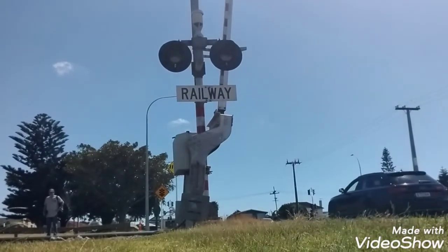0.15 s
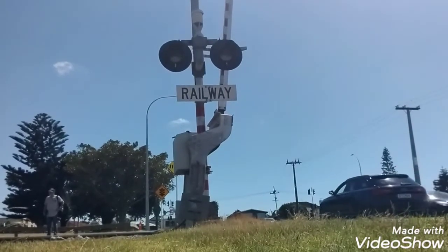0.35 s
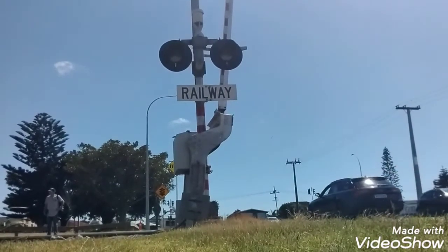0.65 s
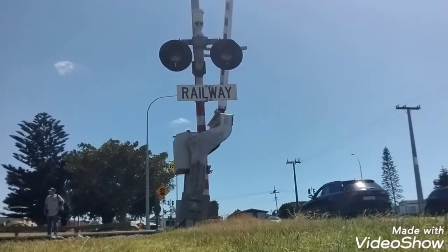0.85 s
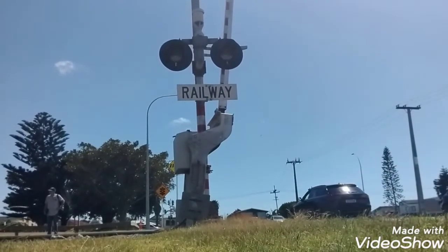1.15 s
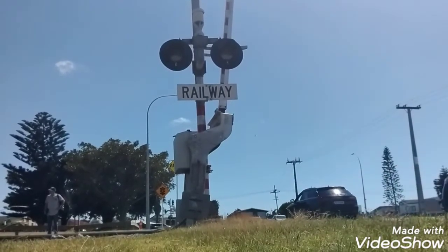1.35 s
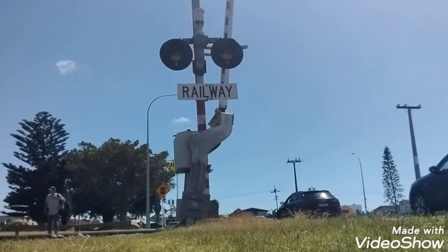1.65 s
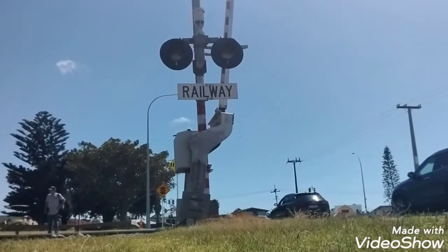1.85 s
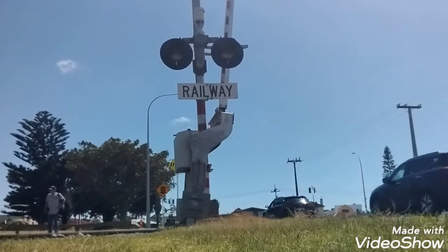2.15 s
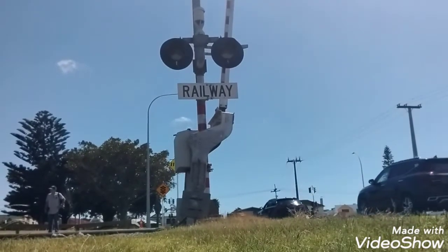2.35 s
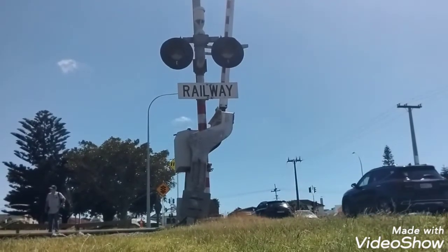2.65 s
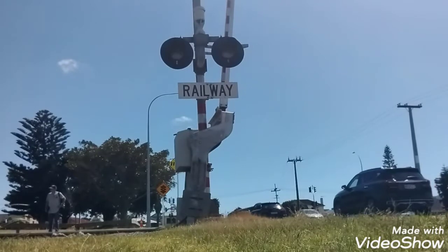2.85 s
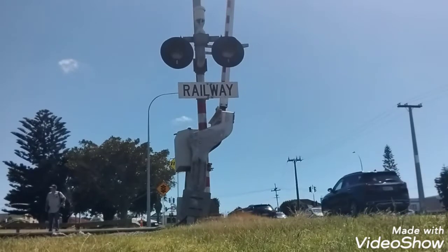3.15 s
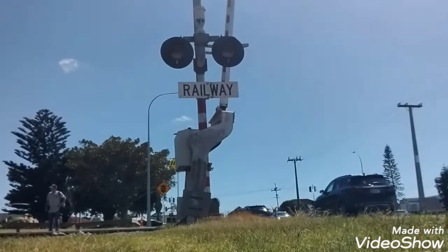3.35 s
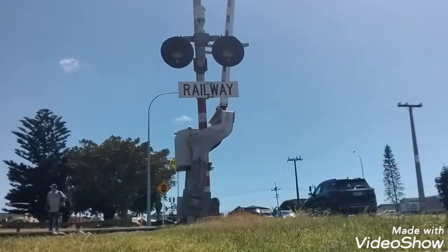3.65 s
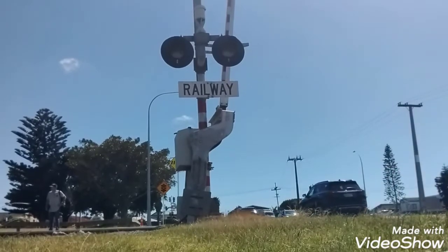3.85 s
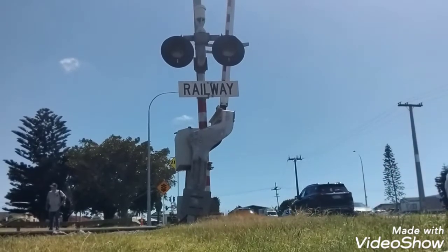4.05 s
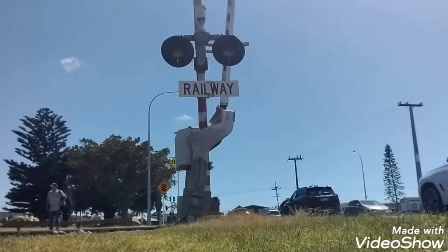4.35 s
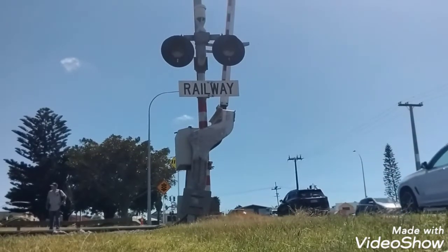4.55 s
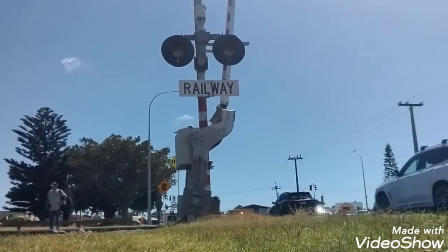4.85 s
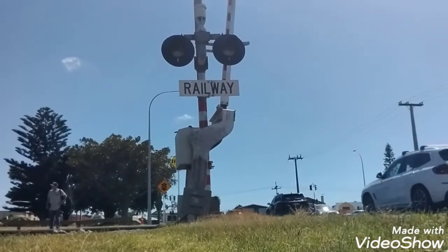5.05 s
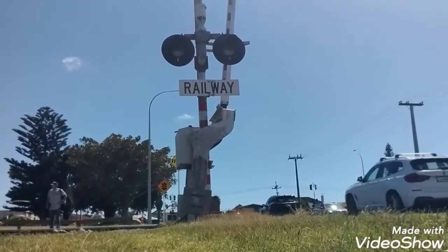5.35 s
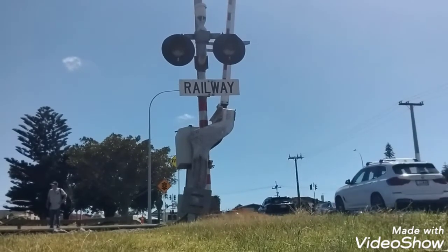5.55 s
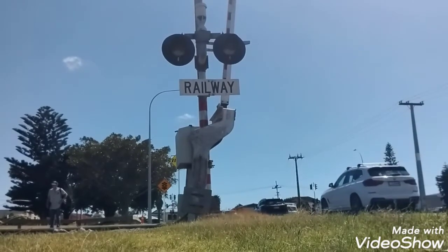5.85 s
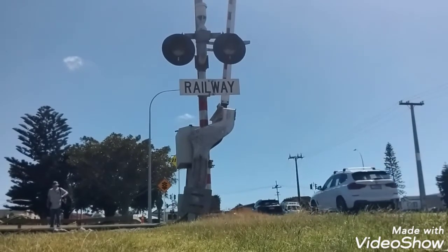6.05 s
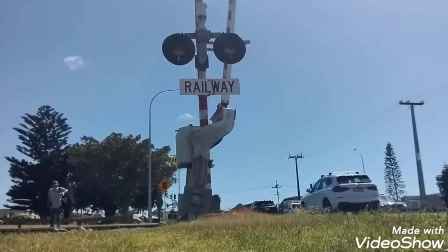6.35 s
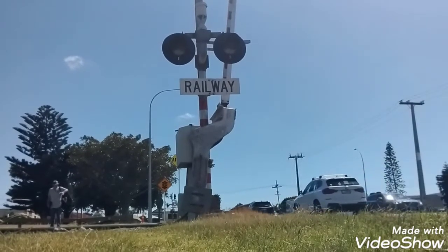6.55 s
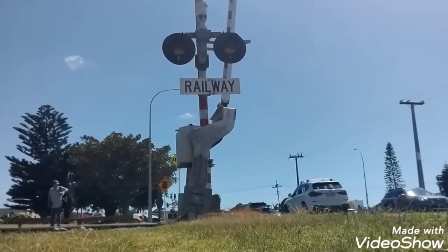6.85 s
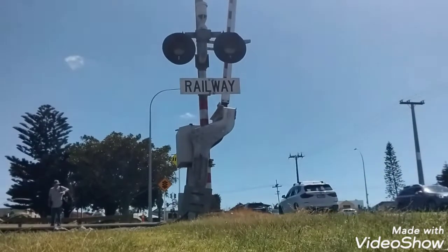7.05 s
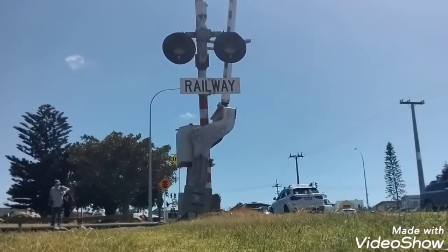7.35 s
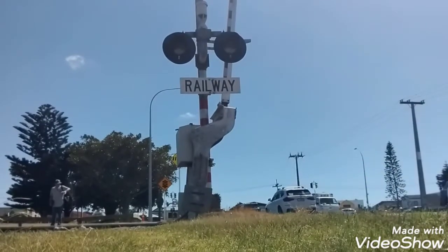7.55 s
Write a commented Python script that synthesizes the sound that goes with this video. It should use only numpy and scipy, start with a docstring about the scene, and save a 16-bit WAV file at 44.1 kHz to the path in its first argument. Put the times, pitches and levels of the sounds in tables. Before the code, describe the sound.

Open-air roadside at a level crossing, heard by a phone low in grass, in stereo. Throughout, slow cars make a low, uneven rumble with muted tyre roar, under a thin flickering hiss of insects and dry grass. Sparrows chirp several times a second, short, slightly hoarse, mostly falling whistles with brief echoes. From 0.4 to 2.4 s wheels thump dully over the rails; a low far engine drone swells around 1.4-2 s amid faint wavering hums. A tiny dry tick comes at 2.1 s. Treble dips briefly near 3.2 s; the road is quieter from 3 to 5 s, with a soft grass brush at 4.6 s. Tyres scrub at 5.4 and 6.5 s, with knocks from 5.4 to 6.5 s. From about 6.2 s a close engine revs up, its deep throbbing boom strongest at 6.6-7.1 s, then drops in pitch and fades by 7.5 s, leaving rumble and a last chirp.

```python
"""A low rumble of cars rolling slowly over a level crossing, under a treble hiss, as at a phone in roadside grass.
Road roar and the hiss of insects and dry grass are noise shaped band by band; a far engine drones and others hum.
Sparrows chirp as gliding whistles with echoes, stalks tick, and wheels over the rails ring as decaying tones.
Late on, one engine revs up and falls back: a sum of sines on multiples of its firing rate."""
import sys
import numpy as np
from scipy import signal
from scipy.io import wavfile
from scipy.ndimage import uniform_filter1d

SR = 44100
rng = np.random.default_rng(int(sys.argv[2]) if len(sys.argv) > 2 else 0)


def pcm_store(signal):
    """Save signal as 16-bit PCM."""
    levels = np.round(np.clip(np.atleast_2d(signal), -1, 1) * 32767)
    wavfile.write(sys.argv[1], SR, levels.astype(np.int16).T)


N = 338688
T = np.arange(N) / SR  # time, s
LAG_S = 0.00025  # road sound reaches the left port this much late

# the two ports: (frequency [Hz], left minus right [dB], likeness [0-1])
PORT_PAIR = [(59.6, 1, 1), (300, 5, 0.99), (700, 2, 0.94), (2040, 3, 0.44), (3300, 1, 0.04),
             (4200, -2, 0.13), (6200, -12, 0), (7230, -3.5, 0.77), (8700, -0.5, 1), (9870, 1.5, 0.97),
             (12400, 11, 0.73), (15300, 20.5, 0.4)]
# revving engine: (time [s], firing rate [Hz], first-order level [dB], second-order level [dB])
REVS = [(5.9, 55.73, -50, -61), (6.08, 51.75, -51, -53), (6.19, 52.85, -45, -44.5),
        (6.37, 62.75, -33.5, -46), (6.5, 68.6, -28.5, -46), (6.59, 73.9, -24.5, -31.5),
        (6.8, 80.4, -24.5, -31), (6.87, 82.47, -23.5, -44), (7.0, 84.5, -23.5, -49),
        (7.08, 82.4, -26, -40.5), (7.226, 77, -27.5, -34), (7.31, 72, -34, -36), (7.4, 66, -41, -49),
        (7.5, 58, -57, -66)]


def undb(db):
    """Amplitude gain of a level: twenty decibels per factor of ten."""
    return 10 ** (np.asarray(db) / 20)


def walk(rate, shape=(N,), step=SR):
    """Band-limited random modulation: values held 1 / rate s, smoothed twice on the last axis; spread 1."""
    hold = max(int(step / rate), 1)
    draws = rng.standard_normal(shape[:-1] + (shape[-1] // hold + 1,))
    held = np.repeat(draws, hold, -1)
    smooth = uniform_filter1d(uniform_filter1d(held, hold), hold)[..., :shape[-1]]
    return smooth / smooth.std()


def curve(table, t):
    """Linear interpolation of a table's columns at times t."""
    s, *columns = np.transpose(table)
    return [np.interp(t, s, column) for column in columns]


def ports(x, lag_s=LAG_S):
    """Level and time difference of a point source on the road: louder but later at the left port."""
    lag = int(lag_s * SR)
    return np.array([undb(0.17) * np.roll(x, lag), undb(-3.5) * x])


def add(out, s, sound):
    """Superposition: mix a short sound in at time s."""
    i = int(s * SR)
    n = min(sound.shape[-1], N - i)
    out[..., i:i + n] += sound[..., :n]


def bed_levels(t):
    """Level in dB of each noise bed at times t; incoherent sources add in power."""
    # traffic: (time [s], rumble [dB], tyre roar [dB], tread whine [dB], air whoosh [dB])
    traffic = [(0.0, -45, -57.5, -63.5, -72), (0.68, -49.5, -53, -62, -69.5), (1.2, -49, -58, -65.5, -71.5),
               (1.6, -42, -60.5, -66, -70.5), (2.27, -47.5, -59.5, -63.5, -68),
               (3.1, -50, -63, -69.5, -74.5), (3.6, -52.5, -60, -63, -65.5), (3.91, -49.5, -57, -66, -66),
               (4.5, -51, -58.5, -64.5, -72.5), (5.15, -50.5, -58, -65, -74), (5.5, -47.5, -54.5, -64, -71),
               (6.4, -45, -58, -63.5, -72), (7.0, -42, -52, -68, -71), (7.68, -50, -56, -62, -74)]
    # narrower road bands that come and go with the cars: (time [s], growl [dB], upper whine [dB])
    narrow_bands = [(0.0, -44, -72), (0.35, -50, -69), (0.77, -43, -68), (1.15, -46, -72.5),
                    (1.6, -47, -78), (2.1, -48.5, -77), (3.23, -59.5, -79.5), (3.7, -54, -69),
                    (4.02, -55.5, -62.5), (4.55, -56.5, -65.5), (5.0, -58.5, -76), (5.39, -47, -65.5),
                    (6.0, -53.5, -68.5), (6.5, -48.5, -70), (7.1, -50.5, -70.5), (7.27, -44, -60),
                    (7.4, -61, -75), (7.68, -56, -66.5)]
    # treble: (time [s], insects [dB], grass [dB], fine grass [dB])
    treble = [(0.0, -64.5, -60, -57), (0.4, -61, -61, -62.5), (0.9, -63.5, -62.5, -61),
              (1.15, -57.5, -60, -57.5), (1.84, -59, -57, -55), (1.99, -65, -60.5, -62),
              (2.31, -58, -55, -58), (2.8, -62, -60.5, -70.5), (3.3, -63.5, -57.5, -60),
              (3.45, -61.5, -56, -67), (3.76, -59, -56.5, -61), (3.98, -61.5, -57.5, -73),
              (4.52, -68.5, -68.5, -72), (4.8, -64.5, -68, -70), (5.09, -72.5, -70, -75),
              (5.4, -64, -63.5, -70), (5.6, -65.5, -67, -74), (6.14, -63, -66, -59.5),
              (6.55, -61.5, -63.5, -69), (6.74, -58.5, -61.5, -63.5), (7.68, -58, -67.5, -72)]
    # tyres scrub over the crossing, so rumble, roar and whine jump: (time [s], rise [dB])
    scrubs = [(5.36, 6.5), (6.46, 6.5)]
    scrub_rise_s, scrub_fall_s = 0.044, 0.057
    lull_s, lull_half_s, lull_db = 3.18, 0.074, -8.5  # the treble dips briefly
    deep_db = -64  # far traffic, at a constant level

    rumble_db, roar_db, whine_db, whoosh_db = curve(traffic, t)
    # the revving car's own rumble lies 12.5 dB under its boom
    rev_db = np.interp(t, *np.transpose(REVS)[[0, 2]], -120, -120) - 12.5
    rumble_db = 10 * np.log10(undb(rumble_db) ** 2 + undb(rev_db) ** 2)

    scrub_db = 0
    for s, rise_db in scrubs:
        scrub_db = scrub_db + rise_db * np.exp(np.minimum((t - s) / scrub_rise_s, (s - t) / scrub_fall_s))
    road = [db + scrub_db for db in (rumble_db, roar_db, whine_db)]

    dip_db = lull_db * np.exp(-((t - lull_s) / lull_half_s) ** 4)
    hiss = [db + dip_db for db in curve(treble, t)]
    return [np.full(t.size, deep_db), *road, *curve(narrow_bands, t), whoosh_db, *hiss]


def bed_power(hz, t):
    """Power spectrum over time: each bed's fixed colour scaled by its moving level, summed in power."""
    # colours, in the order of bed_levels: (frequency [Hz], relative power density [dB per Hz])
    deep = [(15, -47), (25, -17), (43, -1.5), (90, -10.5), (120, -32), (200, -120)]
    rumble = [(53, -22), (90, 5.5), (119, 5.5), (160, 0), (200, -7), (330, -24.5), (430, -31), (730, -120)]
    roar = [(190, -16), (330, -2.5), (539, -2.5), (711, -12.5), (850, -15.5), (1100, -49), (1870, -120)]
    whine = [(500, -20), (850, -1.5), (1150, -6), (1300, -14), (2280, -45), (3850, -120)]
    growl = [(140, -51), (190, 2.5), (255, 3), (310, -7.5), (400, -23)]
    upper_whine = [(1000, -32), (1280, -2.5), (1480, -1), (1700, -10), (2100, -40)]
    whoosh = [(1030, -39), (1750, 7), (2860, 4), (3330, 4), (4900, -8), (6370, -41), (10800, -120)]
    insects = [(2940, -16.5), (4500, -6.5), (4850, -6), (5500, -0.5), (6070, 4.5), (6400, -1.5),
               (6900, 2.5), (7350, 1), (10100, -13), (17200, -120)]
    grass = [(4590, -50), (7500, -12), (8300, -7.5), (8900, -2), (9700, -2.5), (10750, -1), (11300, -6.5),
             (12000, -5), (15000, -38), (22000, -120)]
    fine_grass = [(6760, -36), (11500, 2), (12100, -4.5), (12800, 6.5), (13100, -7), (13500, 3.5),
                  (14200, 1.5), (15700, -4.5)]
    colours = (deep, rumble, roar, whine, growl, upper_whine, whoosh, insects, grass, fine_grass)
    power = 0
    for colour, db in zip(colours, bed_levels(t)):
        f, density_db = np.transpose(colour)
        shape = undb(np.interp(np.log(hz + 1), np.log(f), density_db, -99, -99)) ** 2
        power = power + np.outer(shape / shape.mean(), undb(db) ** 2)
    return power


def bed_flicker(hz, t):
    """Random amplitude modulation in dB, partly shared by neighbouring bands."""
    rate = t.size / t[-1]
    row = (3.5 * np.log2(1 + hz / 150)).astype(int)  # patches a few bands wide
    patches = 0.6 * walk(3.5, (row[-1] + 1, t.size), rate)  # slow swells
    patches += 1.4 * walk(18.0, patches.shape, rate)  # quick flicker
    patches = uniform_filter1d(patches[row], size=3, axis=0)
    patches += 0.33 * np.outer(hz > 7500, walk(12.0, t.shape, rate))  # gusts shake all the grass at once
    # slow random swells in each narrow band of the treble hiss
    band_swells = 2.5 * walk(1.68, (hz.size, t.size), rate) * (hz > 5000)[:, None]
    # short narrow flutters
    lumps = uniform_filter1d(walk(20.0, (hz.size, t.size), rate), size=3, axis=0)
    # patches and flutters are weaker in the treble
    patches[hz > 5000] *= 0.6
    lumps[hz > 5000] *= 0.6
    evenness = np.minimum(hz / 400, 1)[:, None]  # the bass stays more even
    return evenness * (patches + band_swells + 6.7 * lumps)


def beds():
    """Road roar and treble hiss: time-varying filtering of two noises, partly coherent between the ports."""
    size = 1024
    lag_top_hz = 4570  # above this the sound arrives from straight ahead, without lag
    frames = dict(nperseg=size, noverlap=3 * size // 4)
    hz, t, noise = signal.stft(rng.standard_normal((2, N)), SR, **frames)
    power = bed_power(hz, t)
    gain = np.sqrt(power) * undb(bed_flicker(hz, t))

    f, pan_db, like = np.transpose(PORT_PAIR)
    log_hz = np.log(hz + 1)
    pan_db = np.interp(log_hz, np.log(f), pan_db)[:, None]
    like = np.interp(log_hz, np.log(f), np.clip(like, 0, 1))[:, None]
    late = np.exp(-2j * np.pi * hz * LAG_S * (hz < lag_top_hz))[:, None]

    left = noise[0] * late * undb(pan_db / 2)
    right = (like * noise[0] + np.sqrt(1 - like ** 2) * noise[1]) / undb(pan_db / 2)
    # approximate size of the two ports' mean, divided out
    middle = np.sqrt(undb(pan_db) + undb(-pan_db) + 2 * like * np.maximum(late.real, 0)) / 2
    spectra = np.array([left, right]) * gain / middle
    return signal.istft(spectra, SR, **frames)[1][:, :N]


def engines():
    """Periodic tones: a far drone with random level and phase, and brief hums by frequency modulation."""
    # far engine drone at constant pitch, swelling and fading: (time [s], level [dB])
    drone_levels = [(0.6, -54), (1.28, -53.5), (1.4, -44.5), (2.08, -45.5), (2.18, -52), (2.63, -49),
                    (2.79, -59), (5.0, -55), (5.9, -66)]
    # passing cars: (start [s], end [s], start pitch [Hz], end pitch [Hz], level [dB])
    passing_hums = [(0.185, 1.162, 263.2, 249.6, -48), (0.52, 1.05, 223.4, 216.4, -49.5),
                    (0.99, 1.84, 368, 381, -54), (1.352, 1.997, 212.3, 198.1, -47),
                    (1.35, 2.2, 163.2, 159.8, -47), (2.305, 3.095, 96.1, 88.8, -51.5),
                    (2.689, 4.1, 182.4, 170.4, -54.5), (5.452, 5.84, 527, 581, -55),
                    (6.8, 7.901, 432, 430.4, -55.5), (7.194, 7.9, 319.7, 321.7, -56.5)]
    drone_hz = 121.6
    hum_waver = 0.032  # share of the pitch

    db, = curve(drone_levels, T)
    level = undb(db + 3.2 * walk(12.0))
    fade = np.clip((drone_levels[-1][0] - T) / 0.26, 0, 1)
    out = np.sqrt(2) * level * fade * np.sin(2 * np.pi * drone_hz * T + 0.5 * walk(6.5))
    for t0, t1, hz0, hz1, db in passing_hums:
        u = np.clip((T - t0) / (t1 - t0), 0, 1)
        glide = (hz0 + (hz1 - hz0) * u) * (1 + hum_waver * walk(30.0))
        level = undb(db + 3.0 + 2.73 * walk(28.0)) * np.sin(np.pi * u) ** 0.41
        out += level * np.sin(2 * np.pi * np.cumsum(glide) / SR)
    return out


def sparrows():
    """Frequency-modulated whistles with rough flutter, convolved with echoes off hedges and poles."""
    # notes: (time [s], length [s], start pitch [Hz], end pitch [Hz], level before echoes [dB])
    notes = [(0.196, 0.11, 4430, 3440, -66), (0.388, 0.14, 3500, 3370, -60.5),
             (0.407, 0.048, 4150, 4450, -53.5), (0.458, 0.049, 4130, 4040, -49.5),
             (.535, 0.032, 4270, 4200, -65), (0.746, 0.054, 4440, 4290, -59),
             (0.807, 0.052, 3490, 3230, -60), (0.863, 0.039, 4340, 4370, -60),
             (1.032, 0.053, 4040, 4140, -60.5), (1.103, 0.038, 6430, 6160, -54),
             (1.309, 0.074, 4550, 4400, -58.5), (1.381, 0.055, 3440, 3400, -60.5),
             (1.405, 0.052, 4500, 4250, -60), (1.538, 0.11, 4150, 3250, -58.5),
             (1.653, 0.082, 4130, 3650, -59.5), (1.883, 0.069, 4560, 4310, -58),
             (1.938, 0.078, 3730, 3500, -57.5), (2.252, 0.045, 6300, 6970, -50),
             (2.35, 0.035, 6350, 6760, -54), (2.433, 0.14, 3960, 3430, -59.5),
             (2.553, 0.0246, 4300, 5370, -55), (2.584, 0.13, 3790, 3570, -55.5),
             (3.148, 0.079, 3610, 3540, -55.5), (3.11, 0.035, 5200, 4600, -64),
             (3.15, 0.14, 4510, 4200, -59), (3.238, 0.091, 3680, 3410, -57.5),
             (3.624, 0.071, 4480, 4300, -60), (3.698, 0.075, 3330, 3290, -56.5),
             (3.796, 0.1, 4270, 4130, -56), (3.879, 0.1, 3640, 3520, -59),
             (4.275, 0.078, 4400, 4340, -59.5), (4.35, 0.048, 3150, 3200, -59),
             (4.497, 0.07, 4200, 4030, -56.5), (4.659, 0.03, 4900, 4920, -57),
             (4.715, 0.09, 3900, 3710, -59), (4.734, 0.1, 6200, 6170, -64), (4.79, 0.098, 5370, 5320, -66),
             (4.905, 0.045, 4110, 4080, -53), (4.956, 0.05, 3090, 3140, -60.5),
             (5.295, 0.1, 4250, 3560, -58.5), (5.477, 0.065, 4500, 4350, -60),
             (5.531, 0.052, 3770, 3670, -59), (5.6, 0.081, 4150, 3470, -61.5),
             (5.99, 0.023, 5400, 4400, -59.5), (6.016, 0.088, 3790, 3570, -56.5),
             (6.26, .11, 4190, 3740, -51.5), (6.3, 0.1, 3400, 3380, -61), (6.491, 0.074, 4450, 4320, -54),
             (6.56, 0.076, 3650, 3700, -56), (6.583, .08, 6050, 5980, -59), (6.939, 0.076, 6147, 6050, -61),
             (7.086, 0.05, 4490, 4340, -56), (7.131, 0.066, 3850, 3400, -56),
             (7.632, 0.053, 4190, 3790, -54.5)]
    # notes in the middle of the register warble widest
    warble_least_hz, warble_more_hz, warble_at_hz, warble_span_hz = 60, 300, 3750, 270
    warble_per_s = 22  # each note starts on a crest

    out = np.zeros((2, N))
    tremble_hz = 110 * walk(250.0)  # the throat trembles
    hoarse = undb(2 * walk(140.0)) * (1 + 0.6 * walk(900.0))  # hoarseness blurs the whistle
    rasp = 0.55 * walk(750.0)  # breathy noise some hundred Hz wide around the glide
    for s, length, hz0, hz1, db in notes:
        middle_hz = (hz0 + hz1) / 2
        nearness = np.exp(-((middle_hz - warble_at_hz) / warble_span_hz) ** 2)
        warble_hz = warble_least_hz + warble_more_hz * nearness
        pan_db = np.interp(middle_hz, *np.transpose(PORT_PAIR)[:2])

        start = int(s * SR)
        now = slice(start, min(start + int(length * SR), N))
        t = T[now] - T[start]
        u = t / length
        glide = hz0 + (hz1 - hz0) * u ** 1.8
        pitch = glide + warble_hz * np.cos(2 * np.pi * warble_per_s * t) + tremble_hz[now]
        whistle, centre = np.sin(2 * np.pi * np.cumsum([pitch, glide], axis=1) / SR)
        note = np.sin(np.pi * u) ** 0.4 * (hoarse[now] * whistle + rasp[now] * centre)
        port_db = db + np.array([[pan_db], [-pan_db]]) / 2
        add(out, s, undb(port_db) * note / note.std())

    t = T[:SR // 3]
    echoes = rng.standard_normal((2, t.size)) * np.exp(-t / 0.035) * undb(-35)
    echoes[0, 0], echoes[1, 9] = 0.72, 0.72  # direct sound, 9 samples later at the right
    return signal.fftconvolve(out, echoes, axes=1)[:, :N]


def ticks():
    """Transient noise with exponential decay: stalks snap or brush the phone, close to the left port."""
    # stalks: (time [s], relative level [dB], rise [s], 60 dB decay [s])
    stalks = [(2.0617, -29, .001, 0.03), (3.277, -50, .005, 0.15), (4.583, -25.5, 0.027, 0.19),
              (5.165, -41, .03, 0.4)]
    out, t = np.zeros(N), T[:SR // 4]
    for s, db, rise_s, t60 in stalks:
        envelope = np.minimum(t / rise_s, 1) ** 2 * 1000 ** (-t / t60)
        add(out, s, undb(db - 4) * rng.standard_normal(t.size) * envelope)
    bright = signal.butter(2, [10000, 15000], "band", fs=SR, output="sos")
    out = signal.sosfilt(bright, out)
    return np.array([out, undb(-12) * out])


def knocks():
    """Impact response: each wheel thumps the rail, a damped ring of the tyre with a wider noise slap."""
    # wheels over the rails: (time [s], relative level [dB], ring [Hz])
    wheels = [(0.403, -48, 485), (0.638, -47, 460), (1.029, -49, 657), (1.41, -57, 528), (1.822, -51, 564),
              (2.189, -48.5, 558), (2.407, -48, 570), (5.426, -58, 480), (5.542, -42.5, 532),
              (5.746, -56, 576), (5.92, -50.5, 895), (6.125, -46, 884), (6.452, -44.5, 984),
              (7.314, -64, 544)]
    out, t = np.zeros(N), T[:SR // 5]
    for s, db, hz in wheels:
        band = signal.butter(3, [0.6 * hz, 1.5 * hz], "band", fs=SR, output="sos")
        slap = signal.sosfilt(band, rng.standard_normal(t.size))
        decay = np.exp(-t / 0.027) + 3.4 * np.exp(-t / 0.0022)  # a long ring and a sharp start
        ring = np.sin(2 * np.pi * hz * t) * decay
        thump = ring + 0.35 * slap / slap.std() * np.exp(-t / 0.06)
        add(out, s, undb(db) * thump * np.minimum(t / 0.0011, 1))
    return out


def revving():
    """Harmonic series on the firing rate; uneven cylinders add half orders, uneven burns a flutter."""
    # further orders: (multiple of the firing rate, level against the first order [dB])
    further_orders = [(.5, -29), (1.5, -12.5), (2.5, -32), (3, -30), (4, -31)]
    throb_hz, throb_s, throb_db = 9.1, 6.48, 2  # the boom throbs, with a crest at throb_s

    hz, db, second_db = curve(REVS, T)
    fade_in = np.clip((T - REVS[0][0]) / 0.15, 0, 1)
    fade_out = np.clip((REVS[-1][0] - T) / 0.043, 0, 1)
    throb = throb_db * np.cos(2 * np.pi * throb_hz * (T - throb_s))
    db, second_db = db + throb, second_db + throb

    phase = 2 * np.pi * np.cumsum(hz * (1 + 0.011 * walk(40.0))) / SR
    boom = undb(db + 1.1 * walk(22.0)) * np.sin(phase)
    boom -= undb(second_db + 1.9 * walk(18.0)) * np.cos(2 * phase)
    for k, order_db in further_orders:
        level = undb(db + order_db + 1.9 * walk(15.0))
        boom += level * np.sin(k * phase + 1.5 * walk(14.0))
    return np.sqrt(2) * fade_in * fade_out * boom


def scene():
    """Superposition of all sources at the two ports."""
    background = beds()
    rev = ports(revving(), 0.00019)  # shorter lag, s: the revving car is more ahead
    road = ports(engines() + knocks())
    return background + rev + road + ticks() + sparrows()


def record(dry):
    """Low-pass filtering: the phone cuts the top above 15640 Hz."""
    return signal.sosfilt(signal.ellip(10, 0.2, 70, 15640, fs=SR, output="sos"), dry)


dry = scene()
out = record(dry)
pcm_store(out)
```